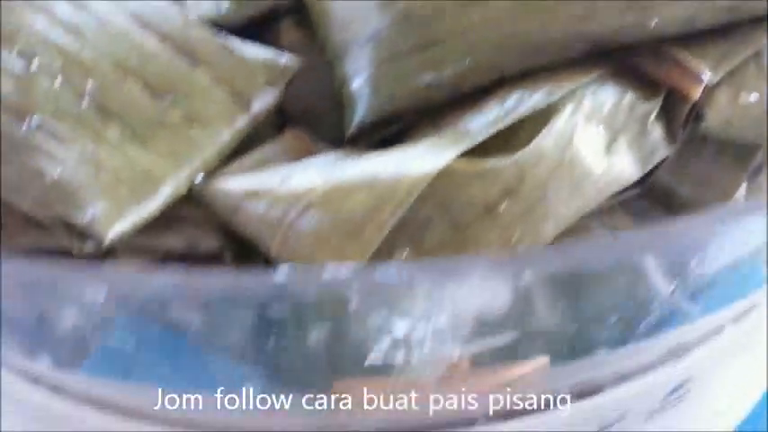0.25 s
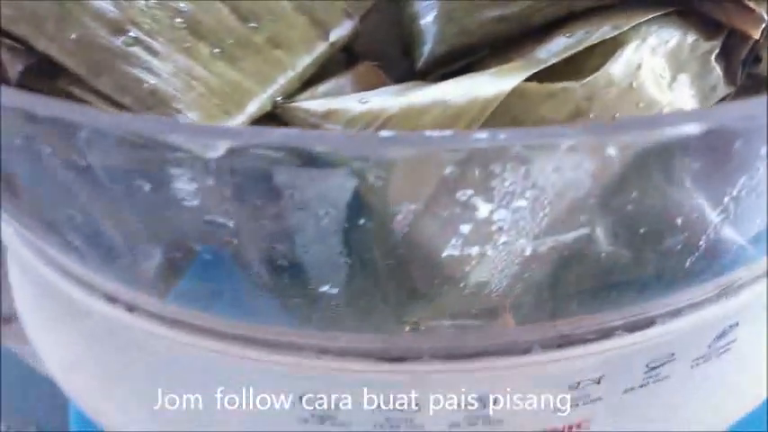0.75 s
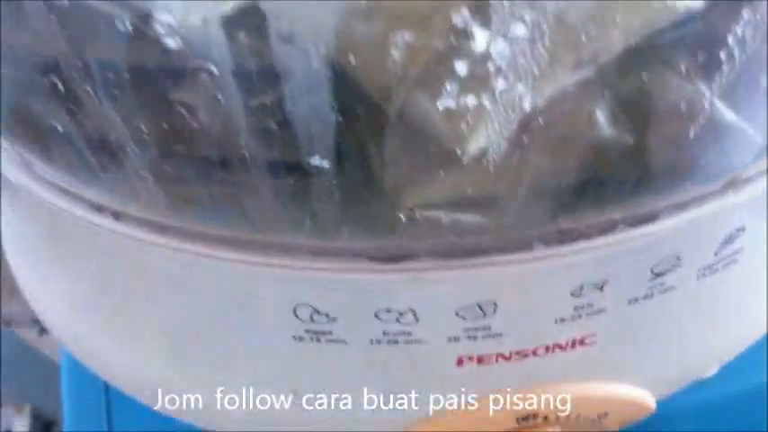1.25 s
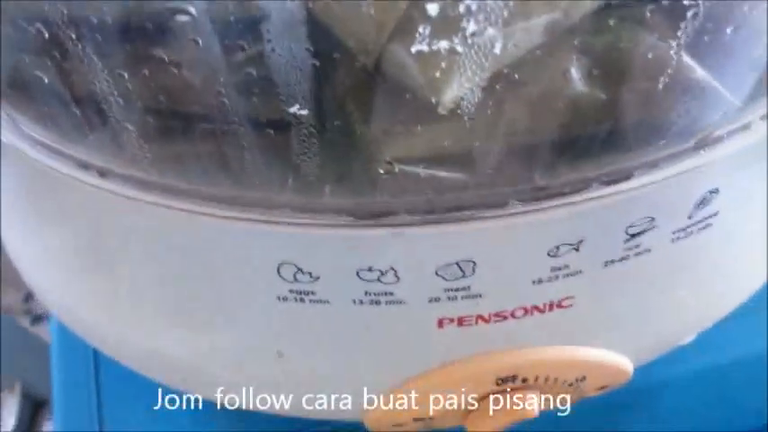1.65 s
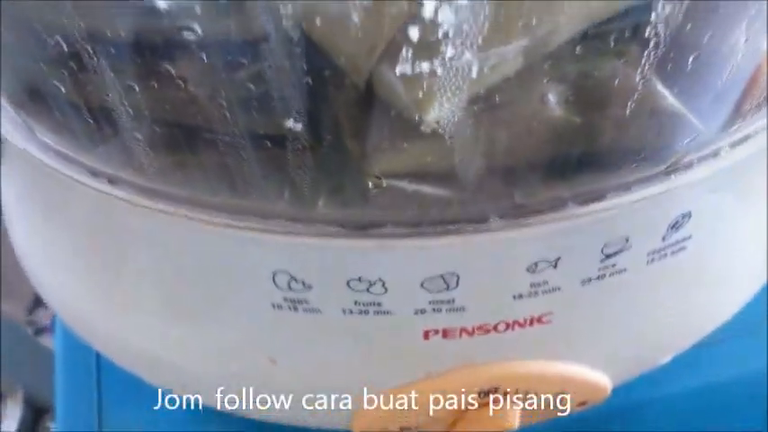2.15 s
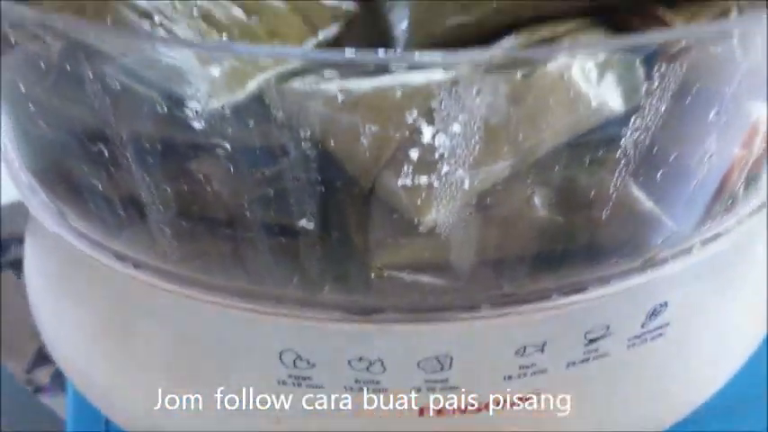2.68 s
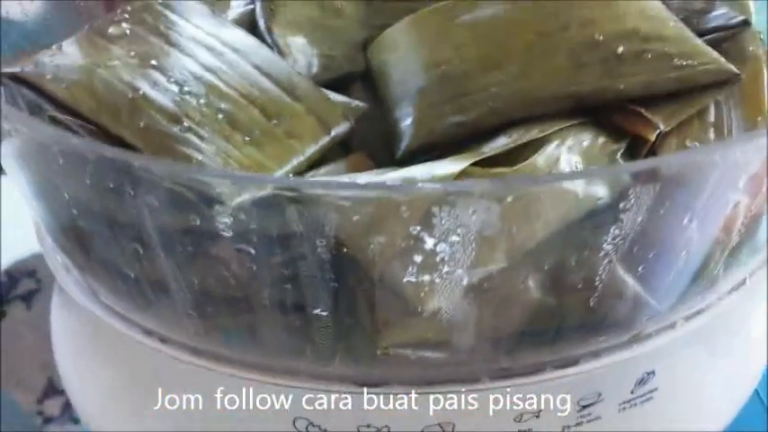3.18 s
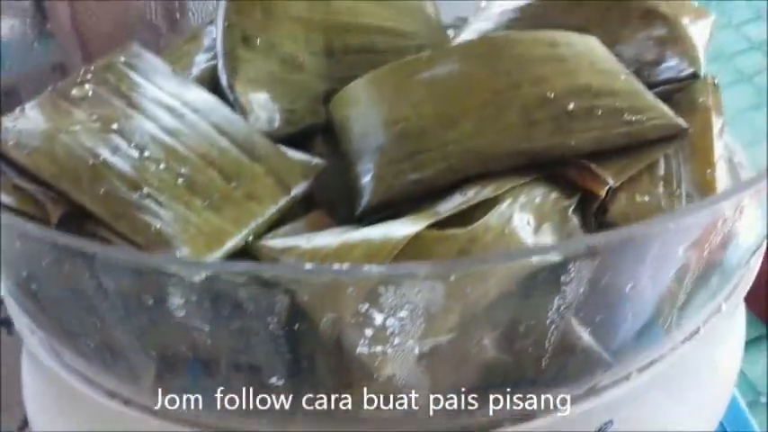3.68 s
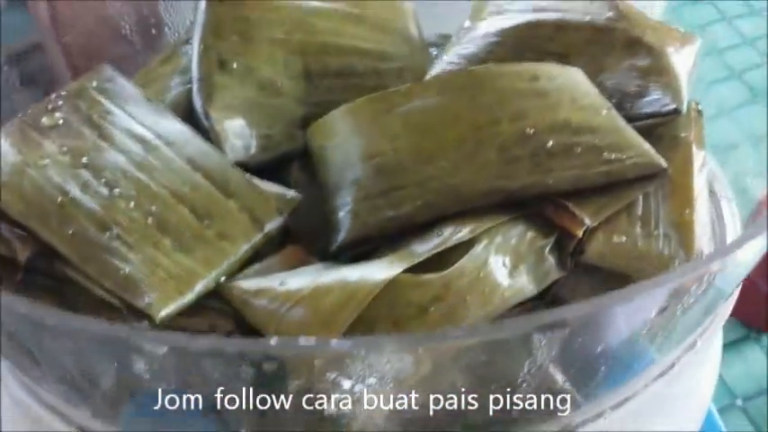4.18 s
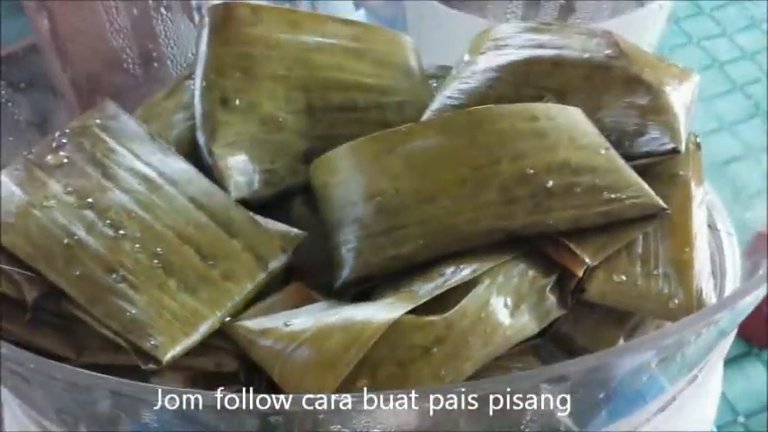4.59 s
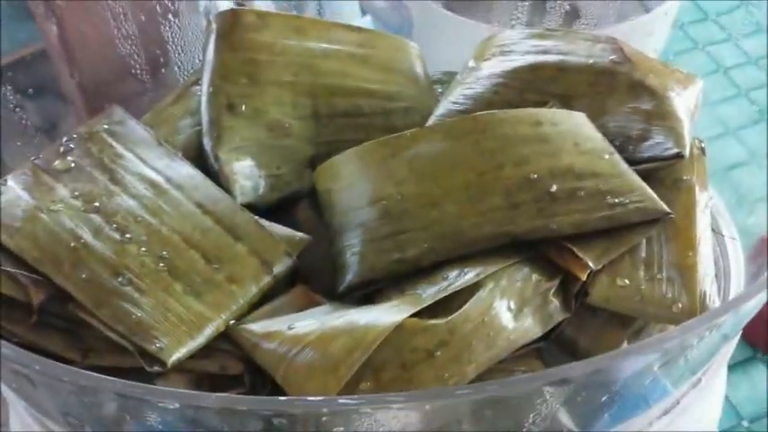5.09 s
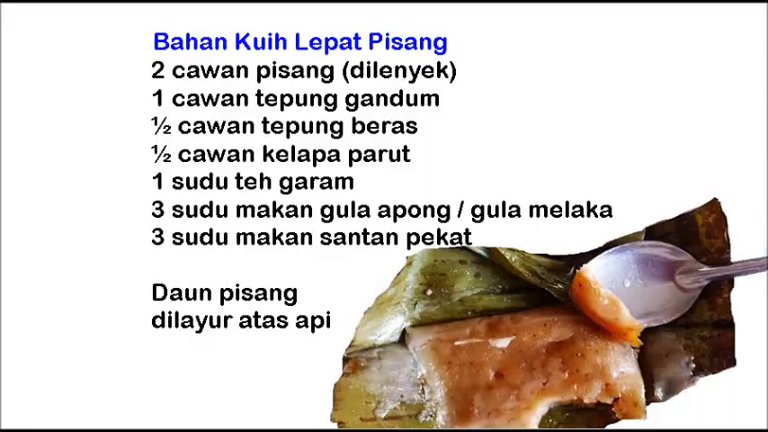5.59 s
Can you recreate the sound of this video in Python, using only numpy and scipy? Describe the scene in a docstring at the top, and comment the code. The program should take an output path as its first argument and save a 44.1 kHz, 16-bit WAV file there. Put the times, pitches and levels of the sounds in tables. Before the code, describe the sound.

A steady bright fizz of simmering water close by, peppered with sharp wet spits and ticks over a faint low bubbling rumble, then a sudden stop.

```python
"""A steady fizz and short, bright spits: an electric food steamer simmers close by in a small kitchen.
Tiny steam bubbles collapsing on the heater are random clicks, coloured and swelling with the simmer.
Splashes on the hot metal are dying crowds of clicks; single bubbles ring as short decaying sines.
Below, the boil rumbles as filtered clicks in wavering bands, and one soft bump rings at two low pitches.
Basket resonances, short reverberation and noise suppression shape it; the sound stops abruptly."""
import sys
import numpy as np
from scipy import signal
from scipy.fft import rfft, irfft, next_fast_len
from scipy.io import wavfile
from scipy.ndimage import uniform_filter1d

SR = 44100
rng = np.random.default_rng(int(sys.argv[2]) if len(sys.argv) > 2 else 0)


def log_audio(samples):
    """Write samples as a 16-bit WAV file to the path given in sys.argv[1]."""
    # one column per channel
    frames = np.atleast_2d(samples).T
    # limit to full scale, then quantise
    limited = np.clip(frames, -1, 1)
    pcm = np.round(limited * 32767).astype(np.int16)
    wavfile.write(sys.argv[1], SR, pcm)


N = 257537
FFT_SIZE = 2 * next_fast_len(N)
BIN_HZ = np.fft.rfftfreq(FFT_SIZE, 1 / SR)

# Splashes of water on the heater. Each row: start in seconds, level in dB before the envelope,
# pitch in Hz, sharpness as Q, rise time constant in seconds, time to fall 60 dB in seconds.
SPLASHES = [(0.007, -27.5, 3400, 1.7, 0.0008, 0.3), (0.06, -26.5, 3690, 3.5, 0.0008, 0.38),
            (0.166, -27, 3530, 1.4, 0.0019, 0.62), (0.186, -29, 6050, 4.6, 0.0019, 0.52),
            (0.306, -33, 4400, 2.3, 0.0026, 0.49), (0.409, -26.5, 4250, 2.2, 0.0017, 0.35),
            (0.422, -26, 4060, 1.3, 0.0012, 0.4), (0.48, -28.5, 4200, 2.9, 0.0053, 0.41),
            (0.562, -29.5, 3550, 1.16, 0.0023, 0.81), (0.733, -39, 3060, 3.7, 0.0022, 0.25),
            (0.821, -33.5, 4120, 2.6, 0.0025, 0.48), (0.894, -29.0, 3380, 1.2, 0.0014, 0.53),
            (1.089, -35.5, 3460, 2.1, 0.0029, 0.37), (1.208, -33, 3560, 1.8, 0.0021, 0.52),
            (1.592, -33.5, 3600, 3.1, 0.0015, 0.38), (1.639, -30, 3840, 1.8, 0.0024, 0.67),
            (1.911, -32.5, 2760, 0.94, 0.0019, 0.52), (2.056, -32.5, 4330, 4.2, 0.0026, 0.36),
            (2.2, -35.5, 3970, 1.7, 0.0015, 0.41), (2.234, -36.5, 2340, 1.7, 0.0048, 0.33),
            (2.249, -32.5, 3930, 3.0, 0.0016, 0.63), (2.329, -37.5, 2840, 2.6, 0.0014, 0.33),
            (2.362, -35.5, 2350, 1.6, 0.002, 0.34), (2.422, -35, 3290, 1.2, 0.0018, 0.41),
            (2.591, -28.5, 3600, 1.3, 0.0029, 0.47), (2.632, -27.5, 4370, 1, 0.0016, 0.58),
            (2.737, -36.5, 3020, 1, 0.0023, 0.69), (2.959, -33.5, 4150, 1.8, 0.0025, 0.36),
            (3.173, -30.0, 3840, 1.7, 0.0056, 0.64), (3.3, -39, 2260, 2.8, 0.0017, 0.47),
            (3.505, -32.5, 2330, 3.7, 0.0032, 0.25), (3.507, -31.5, 4000, 2.5, 0.0016, 0.27),
            (3.838, -36.5, 2980, 1.4, 0.0034, 0.51), (3.875, -38.5, 3650, 3.2, 0.0018, 0.51),
            (3.941, -31.5, 4030, 3.2, 0.0022, 0.24), (4.081, -33.5, 3600, 0.87, 0.0019, 0.7),
            (4.186, -38.5, 4000, 3.9, 0.0019, 0.95), (4.317, -36.5, 3950, 3.6, 0.0012, 0.32),
            (4.338, -32.5, 4000, 2.9, 0.0038, 0.77), (4.485, -28.5, 6180, 4.9, 0.0043, 0.82),
            (4.488, -24.5, 2740, 1.9, 0.00087, 0.34), (4.559, -36, 2570, 3.2, 0.0025, 0.46),
            (4.709, -36, 3900, 3.9, 0.0013, 0.3), (4.741, -29.5, 3750, 2, 0.0019, 0.65),
            (4.877, -31.5, 3870, 2.7, 0.003, 0.61), (4.953, -31.5, 2380, 2, 0.0012, 0.3),
            (4.956, -25.5, 3810, 5.1, 0.00094, 0.33), (5.057, -30, 4270, 2.3, 0.0017, 0.19),
            (5.128, -33.5, 3320, 2.4, 0.001, 0.35), (5.129, -31, 2230, 3.1, 0.001, 0.48),
            (5.153, -30.5, 3980, 2.8, 0.0014, 0.66), (5.265, -28, 4240, 2.1, 0.0038, 0.52),
            (5.413, -32.5, 4130, 3.4, 0.0015, 0.4)]
# Strength of the simmer. Each row: time in seconds, level in dB before each layer's own offset.
SIMMER_LEVEL = [(0.0, -33), (0.1, -33), (0.27, -34), (0.38, -35.0), (0.47, -33), (0.65, -36.5),
                (0.84, -33.5), (0.9, -36.5), (1.0, -34.5), (1.5, -33), (1.6, -37), (1.77, -34),
                (1.8, -37.5), (1.95, -36.5), (2.08, -32), (2.25, -37.5), (2.33, -32.5), (2.53, -33.5),
                (2.56, -32.0), (2.69, -35.5), (2.86, -34.5), (3.23, -35), (3.41, -37.0), (3.51, -34.5),
                (3.64, -34.5), (3.77, -36), (3.91, -37.5), (4.0, -32.5), (4.18, -36.0), (4.36, -36.5),
                (4.42, -34.0), (4.6, -33.5), (4.68, -39), (4.77, -32.5), (5.06, -33.5), (5.18, -35),
                (5.39, -36), (5.49, -34.0), (5.6, -34.5)]
# Colour of the fizz. Each row: frequency in Hz, relative density in dB per Hz.
FIZZ_COLOUR = [(700, -25), (1500, -17), (1650, -22), (1900, -8.5), (2350, -4), (2900, -5.5), (3500, -2.8),
               (4200, 0.5), (5200, -1.75), (5700, 2.5), (6400, 5.5), (7300, 0), (9500, -5.5),
               (12000, -14.5), (14600, -30)]


def from_db(db):
    """Turn decibels into amplitude gain."""
    return 10 ** (np.asarray(db) / 20)


def rms_one(x):
    """Scale to an rms of 1."""
    return x / np.sqrt(np.mean(x ** 2) + 1e-20)


def in_time(rows):
    """Read a (seconds, value) curve at every sample."""
    return np.interp(np.arange(N) / SR, *np.transpose(rows))


def per_bin(points):
    """Read a (Hz, value) curve at every FFT bin, straight over log frequency."""
    hz, value = np.transpose(points)
    return np.interp(np.log(BIN_HZ + 1), np.log(hz), value)


def colour(x, gain):
    """Filter by one gain per FFT bin."""
    return irfft(rfft(x, FFT_SIZE) * gain, FFT_SIZE)[..., :N]


def drift(rate_hz):
    """Slow random wander with rms 1: noise through two equal low-pass poles, one value per 40 samples."""
    pole = np.exp(-80 * np.pi * rate_hz / SR)
    noise = rng.standard_normal(N // 40 + 2002)
    slow = signal.lfilter([1], [1, -2 * pole, pole * pole], noise)[2000:]  # skip the filter's start
    return np.interp(np.arange(N) / 40, np.arange(len(slow)), rms_one(slow))


def resonate(x, hz, width_hz):
    """One resonance: a two-pole band-pass with a gain of about 1 at its peak."""
    pole = np.exp(-np.pi * width_hz / SR)
    top = np.array([1, 0, -1]) * (1 - pole * pole) / 2
    bottom = [1, -2 * pole * np.cos(2 * np.pi * hz / SR), pole * pole]
    return signal.lfilter(top, bottom, x + 1e-18)


def collapses(size, per_s, spread_db):
    """Bubble collapses as random clicks of uneven strength and sign, separate at each port; rms 1."""
    born = rng.random((2, size)) < per_s / SR
    strength = from_db(spread_db * np.minimum(rng.exponential(1, (2, size)), 4))
    return rms_one(born * strength * rng.choice([-1, 1], (2, size)))


def ringing_bubbles(per_s, cycles, low_hz, high_hz):
    """Decaying sines at random times, with random pitch, strength and phase at either port; rms 1.

    Each falls 60 dB within the given number of cycles, so higher bubbles die sooner.
    """
    out, t = np.zeros((2, N + SR)), np.arange(SR // 8) / SR
    count = int(per_s * N / SR)
    for when, size, strength, *phases in rng.random((4000, 5))[:count]:
        turns = t * low_hz * (high_hz / low_hz) ** size
        envelope = (1 - np.exp(-turns)) * from_db(12.4 * strength - 60 * turns / cycles)
        at = int(when * N)
        out[:, at:at + len(t)] += envelope * np.sin(2 * np.pi * (turns + np.c_[phases]))
    return rms_one(out[:, :N])


def rumble():
    """Large bubbles churn in the tank: clicks partly shared by the ports, each band wavering on its own."""
    # Colour of the rumble. Each row: frequency in Hz, relative density in dB per Hz.
    rumble_colour = [(20, -6.5), (40, -12), (70, -3), (90, -2), (150, 1), (200, -0.6), (295, 0.4),
                     (400, -1), (470, -5.5), (540, -3), (750, -7), (1050, -5.5), (1400, -5), (1700, -4.5),
                     (2500, -37)]
    # Likeness of the rumble at the two ports. Each row: frequency in Hz, correlation (no unit).
    port_likeness = [(30, 0.18), (100, 0.25), (280, 0.73), (480, 0.51), (750, 0.069), (1500, 0.056)]
    # Edges between the bands for different bubble sizes, in Hz.
    band_edges = [0, 180, 400, 650, 850, 1100, 1400, 30000]
    level_db, churn_db, churn_hz = -50, 0.63, 34
    gurgle_db, gurgle_hz = 1.84, 14.7

    mid, side = collapses(N, per_s=4000, spread_db=3.0)
    alike = np.clip(per_bin(port_likeness), -1, 1)
    gain = from_db(per_bin(rumble_colour))
    shared = colour(mid, gain * np.sqrt(1 + alike))
    opposed = colour(side, gain * np.sqrt(1 - alike)) * [[1], [-1]]
    water = rms_one(shared + opposed)

    gurgling = 0
    for low, high in zip(band_edges, band_edges[1:]):
        band = colour(water, (BIN_HZ >= low) & (BIN_HZ < high))
        gurgling = gurgling + band * from_db(gurgle_db * drift(gurgle_hz))
    return from_db(level_db + churn_db * drift(churn_hz)) * rms_one(gurgling)


def plops():
    """Larger bubbles burst at the surface and ring softly between rumble and fizz."""
    return from_db(-59) * ringing_bubbles(per_s=40, cycles=66, low_hz=518.3, high_hz=1407)


def bumps():
    """A soft contact: two low sines swell for a few milliseconds and die away, alike at both ports."""
    # The two rings of the bump. Each row: start in seconds, level in dB before a shared lift of 13.5 dB
    # and the envelope, pitch in Hz, time to fall 60 dB in seconds.
    bump_rings = [(0.484, -40.5, 247, 0.04), (0.488, -54, 113, 0.16)]
    out = np.zeros(N)
    for start_s, level_db, hz, t60_s in bump_rings:
        t = np.maximum(np.arange(N) / SR - start_s, 0)
        swell = 1 - np.exp(-t / 0.0032)
        decay = from_db(level_db + 13.5 - 60 * t / t60_s)
        out += decay * swell * np.sin(2 * np.pi * hz * t)
    return out


def pings():
    """Single small bubbles ring out of the fizz, sharing its colour and following the simmer."""
    rings = ringing_bubbles(per_s=260, cycles=130, low_hz=2307, high_hz=7100)
    level = from_db(in_time(SIMMER_LEVEL) - 9)
    return rms_one(colour(rings, from_db(per_bin(FIZZ_COLOUR)))) * level


def fizz():
    """Thousands of collapses a second in quick flurries; the finest spray follows the simmer less."""
    offset_db, waver_db, waver_hz = 2, 0.5, 7.2
    fine_db, fine_waver_db, fine_follows = -40, 1.0, 0.51  # the last is the share of the simmer's swing in dB
    spray_above_hz = 8300

    flurries = from_db(0.83 * drift(25))
    gain = from_db(per_bin(FIZZ_COLOUR))
    # power share of the spray: near 0 below the crossover, near 1 above
    fine_share = 1 / (1 + (spray_above_hz / (BIN_HZ + 1)) ** 12)
    coarse_clicks = collapses(N, per_s=9000, spread_db=2.0) * flurries
    fine_clicks = collapses(N, per_s=9000, spread_db=2.5) * flurries
    coarse = rms_one(colour(coarse_clicks, gain * np.sqrt(1 - fine_share)))
    fine = rms_one(colour(fine_clicks, gain * np.sqrt(fine_share)))

    vigour = from_db(in_time(SIMMER_LEVEL) + offset_db + waver_db * drift(waver_hz))
    fine_level = from_db(fine_db + fine_waver_db * drift(waver_hz))
    return coarse * vigour + fine * rms_one(vigour) ** fine_follows * fine_level


def pops():
    """A larger bubble, alone or opening a splash, rings for a few cycles; left hears it 0.05 ms later."""
    # Further sharp pops of larger bubbles, some alone, some at the start of a splash. Each row: start in
    # seconds, level in dB at the top of the swell, pitch in Hz.
    further_pops = [(0.0084, -19, 3500), (0.0612, -16, 3900), (0.5064, -17, 4260), (1.386, -22, 6100),
                    (3.1659, -23, 6300), (3.311, -23, 2600), (3.7421, -23, 6200), (3.961, -21, 6300),
                    (4.4883, -11.5, 2800), (4.4926, -18, 2800), (4.4995, -19, 2700), (5.1302, -22, 2500),
                    (5.4205, -23, 4300), (5.4645, -23, 4100)]
    opening_pops = [(s, level_db + 5, hz) for s, level_db, hz, *_ in SPLASHES]
    out, t = np.zeros((2, N + SR)), np.arange(SR // 50) / SR
    t = np.maximum(t - np.array([[.00005], [0]]), 0)
    for start_s, level_db, hz in list(further_pops) + opening_pops:
        cycles = t * hz
        swell = (cycles * np.exp(1 - cycles)) ** 2  # full after one cycle
        at = round(start_s * SR)
        out[:, at:at + t.shape[1]] += from_db(level_db) * swell * np.sin(2 * np.pi * cycles)
    return out[:, :N]


def spits():
    """Each splash boils off at once: a dying crowd of collapses, pitched by the size of its bubbles."""
    out, t = np.zeros((2, N + SR)), np.arange(SR // 2) / SR
    for start_s, level_db, hz, q, rise_s, t60_s in SPLASHES:
        crowd = collapses(len(t), per_s=7000, spread_db=2.5)
        crowd = rms_one(resonate(resonate(crowd, hz, hz / q), hz, hz / q))
        envelope = (1 - np.exp(-t / rise_s)) * from_db(-60 * t / t60_s)
        at = round(start_s * SR)
        out[:, at:at + len(t)] += crowd * from_db(level_db) * envelope
    return out[:, :N]


def basket(x):
    """The air in tank and basket resonates: parallel band-passes lift or lower a few narrow bands."""
    # Resonances of tank and basket. Each row: centre in Hz, width in Hz, nominal lift in dB.
    cavity_modes = [(1186, 80, 5), (1812, 37, 3), (2500, 22, 2), (2870, 36, 1.5), (3090, 94, 2.5),
                    (3500, 150, -2), (4220, 400, 2.5), (4590, 130, 2.5), (6630, 121, 3)]
    return x + sum((from_db(lift_db) - 1) * resonate(x, hz, width_hz)
                   for hz, width_hz, lift_db in cavity_modes)


def kitchen(x):
    """Direct sound plus dense, dying reflections, different at each port; the power is roughly kept."""
    t60_s, wet = 0.14, from_db(-7.5)
    t = np.arange(SR // 2) / SR
    noise = rng.standard_normal((2, len(t)))
    tail = rms_one(noise * from_db(-60 * t / t60_s)) / np.sqrt(len(t))  # unit energy
    reflections = signal.fftconvolve(x, tail, axes=1)[:, :N]
    return (x + wet * reflections) / np.sqrt(1 + wet ** 2)


def lulls(x):
    """Below the fizz, one band or another dips for a moment along a bell-shaped curve."""
    # Brief dips. Each row: centre in seconds, half length in seconds, depth in dB, lower edge in Hz,
    # upper edge in Hz.
    band_dips = [(0.235, 0.053, 8.5, 530, 1120), (0.38, 0.034, 10, 450, 620), (0.8, .06, 4, 740, 930),
                 (0.26, 0.044, 23, 1420, 1750), (0.46, 0.066, 10, 1460, 1690),
                 (1.154, 0.0062, 14, 18, 1000), (1.36, 0.026, 14, 570, 1080),
                 (1.605, 0.024, 4.5, 450, 1790), (1.854, .01, 10, 20, 1900), (2.7, 0.049, 11.5, 820, 1030),
                 (2.924, 0.0061, 23, 20, 1700), (2.966, 0.0059, 26, 20, 1800),
                 (3.098, 0.024, 13, 790, 1070), (4.024, 0.018, 13, 730, 1600), (4.339, 0.021, 8, 410, 1000),
                 (4.779, 0.037, 6.5, 420, 1070), (4.807, 0.037, 18, 1420, 1744),
                 (5.068, 0.025, 4, 610, 1770)]
    t = np.arange(N) / SR
    for centre_s, half_s, depth_db, low_hz, high_hz in band_dips:
        below_high = 1 / (1 + (BIN_HZ / high_hz) ** 40)
        below_low = 1 / (1 + (BIN_HZ / low_hz) ** 40)
        band = colour(x, below_high - below_low)
        dip = from_db(-depth_db * np.exp(-((t - centre_s) / half_s) ** 2))
        x = x + band * (dip - 1)
    return x


def suppress(x):
    """A noise suppressor turns each narrow band down, by up to 18 dB, while it is below its floor."""
    # What the suppressor takes for background. Each row: frequency in Hz, density in dB per Hz.
    background = [(100, -85.5), (300, -83), (700, -82), (1600, -82.5), (2500, -99), (14000, -115)]
    hz, _, frames = signal.stft(x, SR, nperseg=1024, noverlap=768, scaling="psd")
    power = 2 * np.mean(np.abs(frames) ** 2, axis=0)  # both ports share one gain
    power = uniform_filter1d(power, size=4, axis=0)  # smooth over frequency, then time
    power = uniform_filter1d(power, size=7, axis=1)
    floor_hz, floor_db = np.transpose(background)
    above_db = 10 * np.log10(np.abs(power) + 1e-20) - np.interp(hz, floor_hz, floor_db)[:, None]
    gain = from_db(np.clip(2.5 * above_db, -18, 0))
    return signal.istft(frames * gain, SR, nperseg=1024, noverlap=768, scaling="psd")[1][:, :N]


def scene():
    """Boil and sputter sound through the basket into the room, with brief dips; the bump is added dry."""
    boil = fizz() + pings() + plops() + rumble()
    # bubbles on the heater are too small to radiate any bass
    no_bass = signal.butter(10, 2050, "high", fs=SR, output="sos")
    sputter = signal.sosfilt(no_bass, spits() + pops(), axis=1)
    return lulls(kitchen(basket(boil + sputter))) + bumps()


def record(dry):
    """Two microphone ports colour the sound, weak bands are suppressed, it stops, the top is cut."""
    # Colour difference of the ports. Each row: frequency in Hz, left minus right in dB.
    port_balance = [(300, -1), (550, -1), (750, 11), (1150, -1), (2200, 0.5), (2900, -4.5), (4000, -5),
                    (5100, -0.5), (5900, 13.5), (6500, 8.5), (7300, 1.5), (8500, -9), (11000, -6),
                    (13500, -21.5)]
    stop_s, stop_t60_s = 5.603, 0.037
    ratio = from_db(per_bin(port_balance))
    # the ports' squared gains add up to 2 at every frequency
    port_gains = np.array([ratio, np.ones_like(ratio)]) * np.sqrt(2 / (1 + ratio ** 2))
    heard = suppress(colour(dry, port_gains))
    heard = heard * from_db(-60 * np.maximum(np.arange(N) / SR - stop_s, 0) / stop_t60_s)
    # steep low-pass at 14.7 kHz: 0.1 dB ripple, 90 dB rejection
    return signal.sosfilt(signal.ellip(12, .1, 90, 14700, fs=SR, output="sos"), heard)


dry = scene()
out = record(dry)
log_audio(out)
```